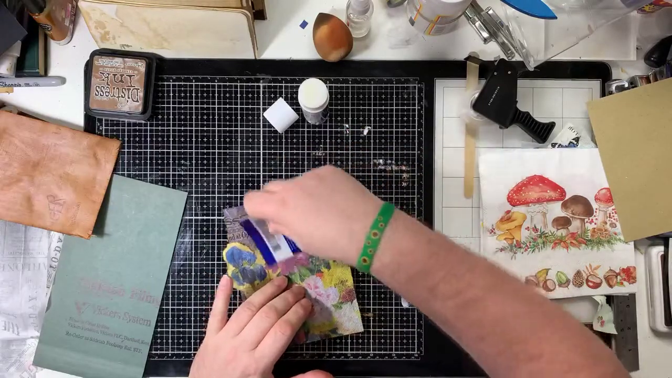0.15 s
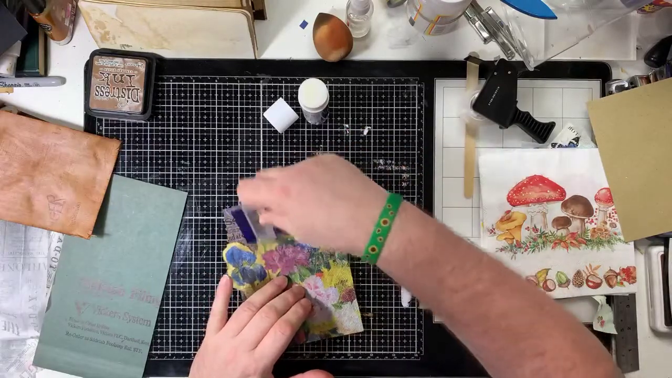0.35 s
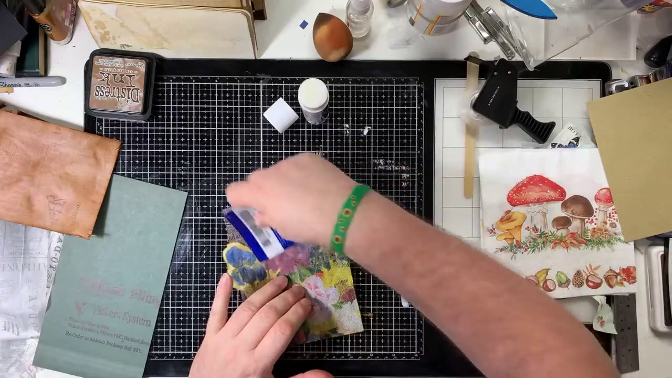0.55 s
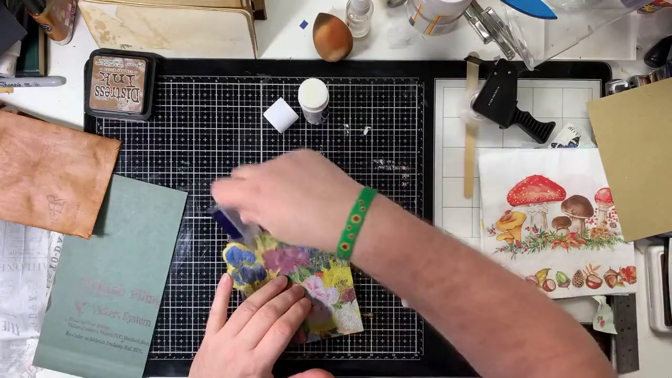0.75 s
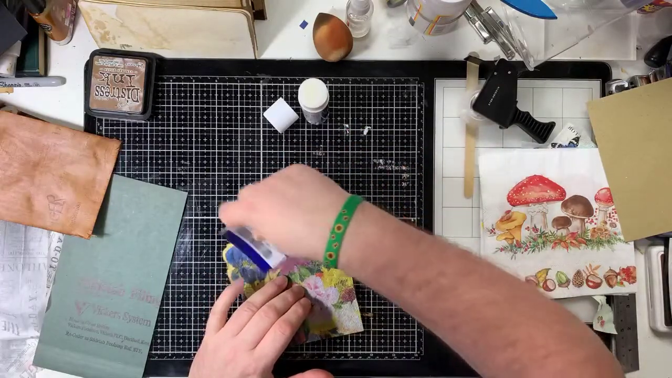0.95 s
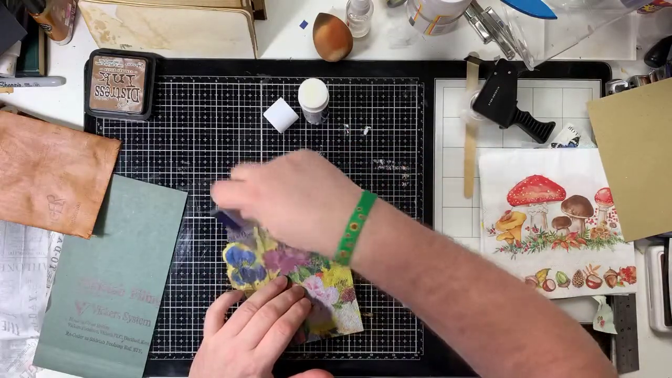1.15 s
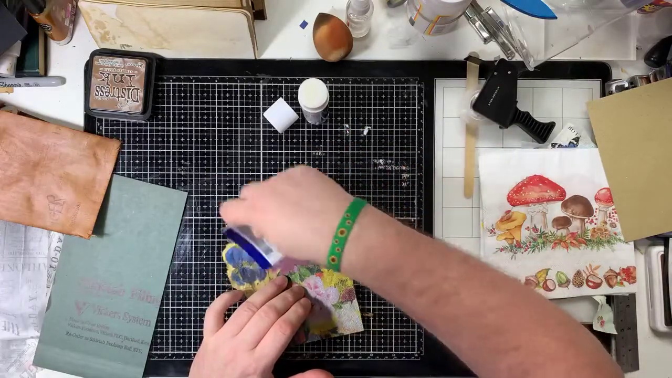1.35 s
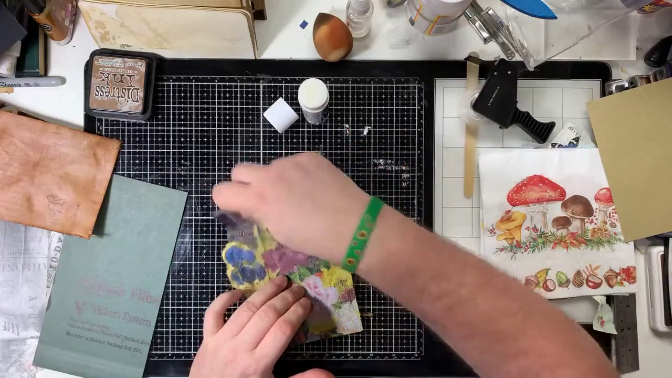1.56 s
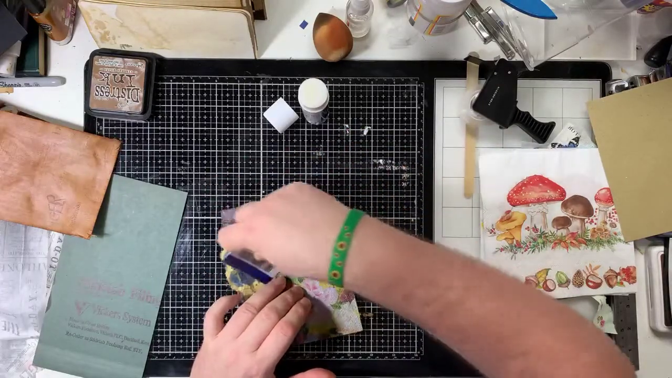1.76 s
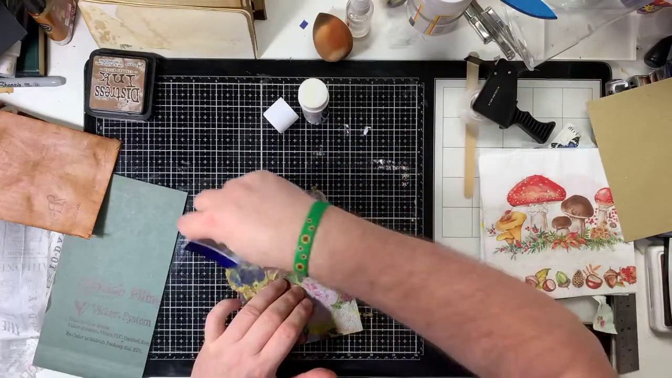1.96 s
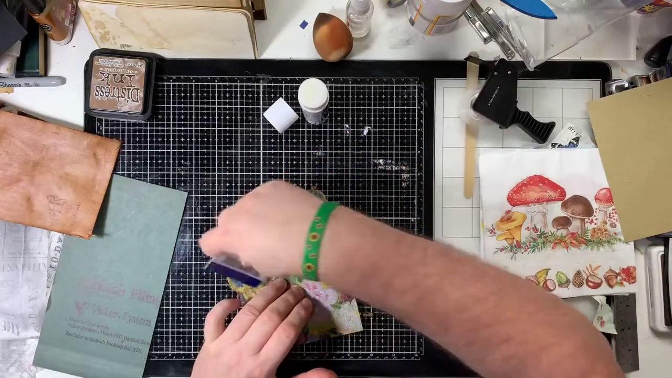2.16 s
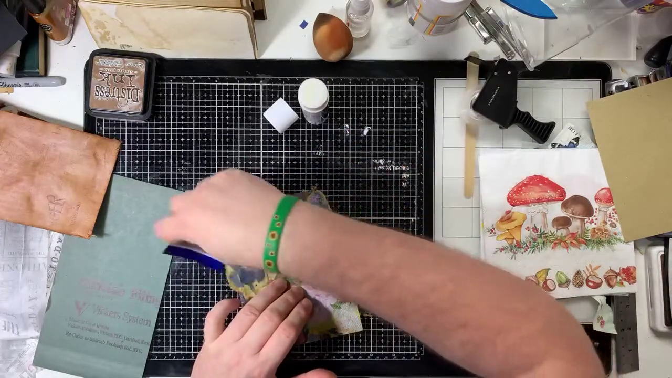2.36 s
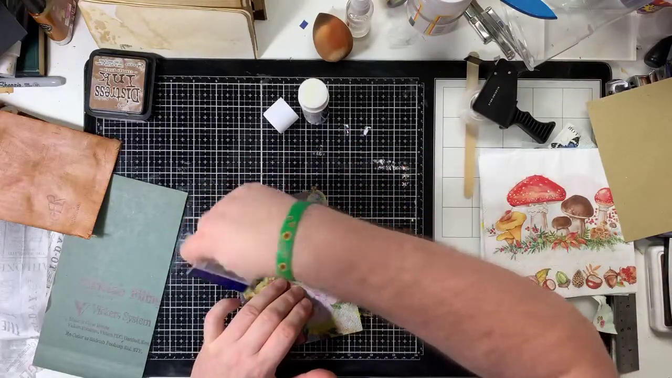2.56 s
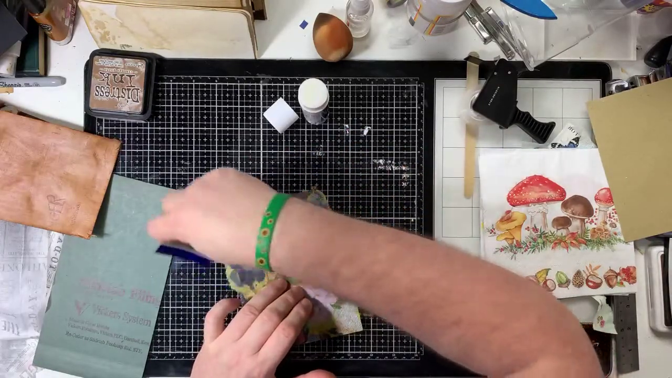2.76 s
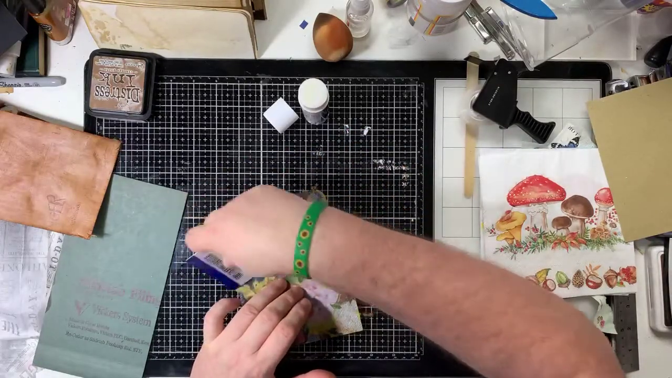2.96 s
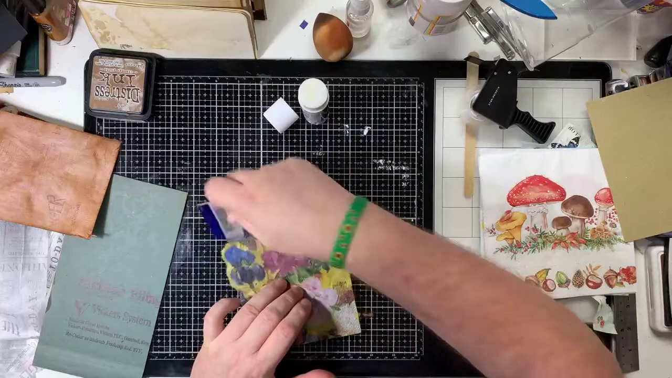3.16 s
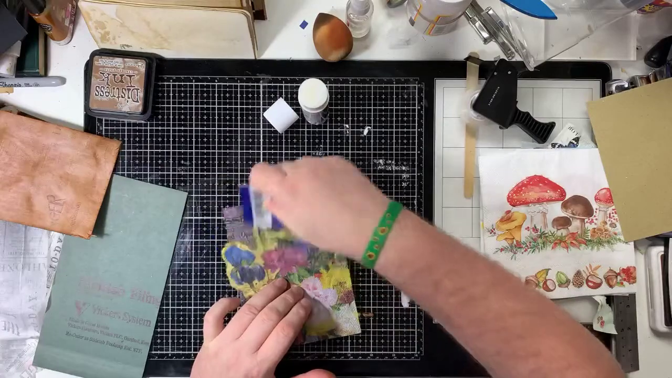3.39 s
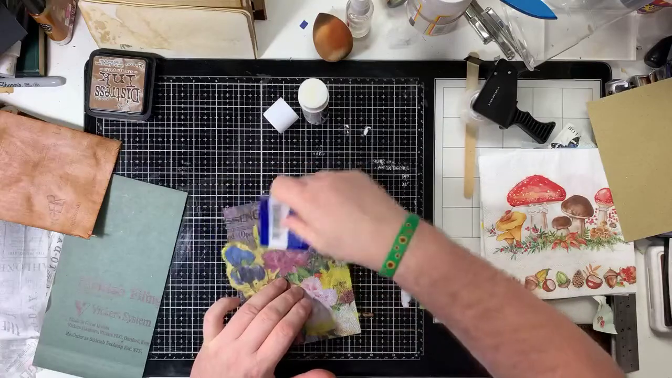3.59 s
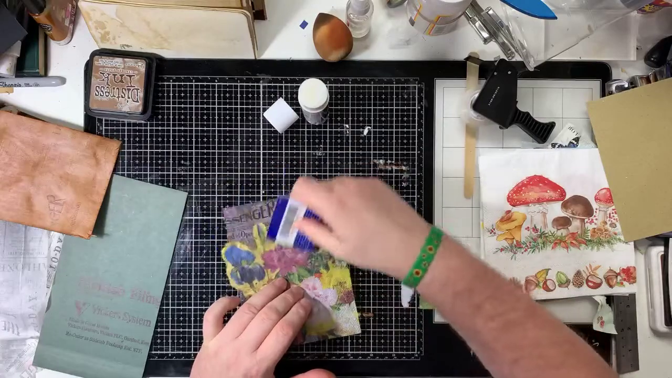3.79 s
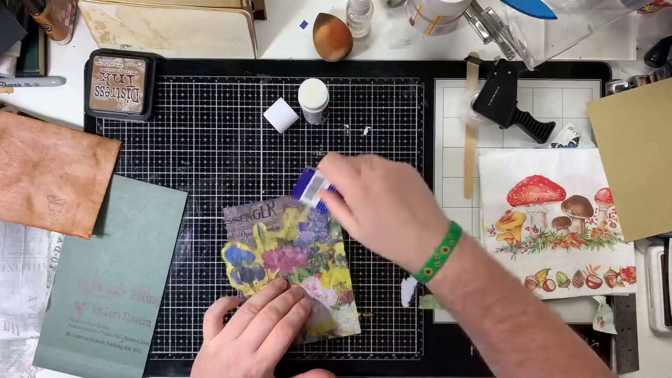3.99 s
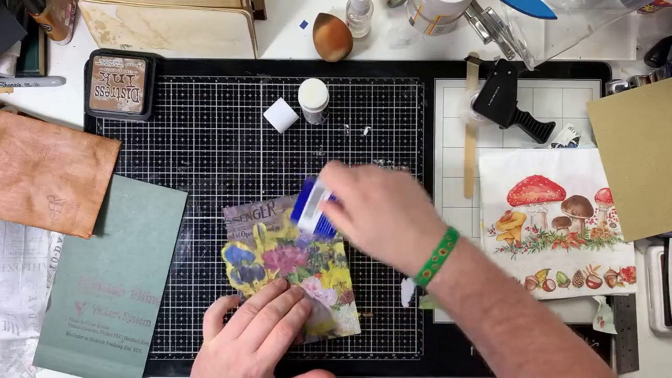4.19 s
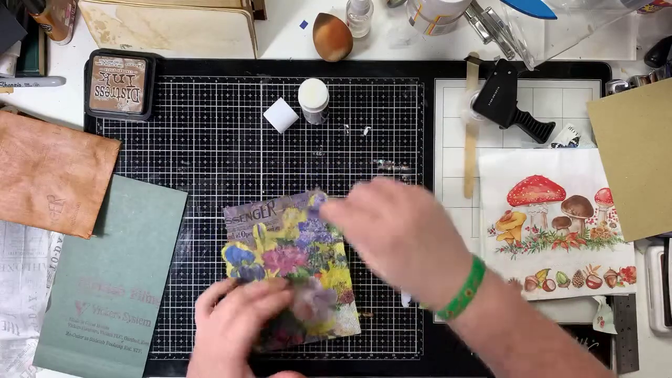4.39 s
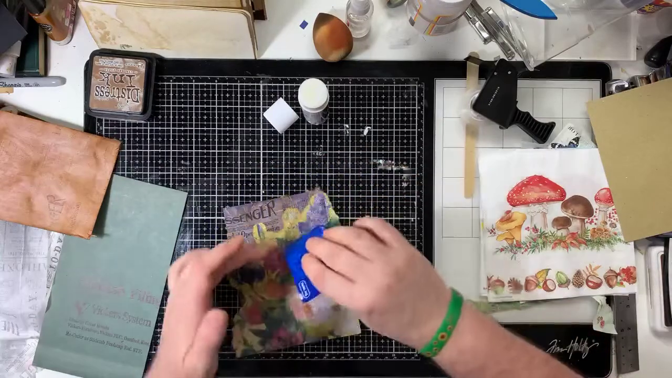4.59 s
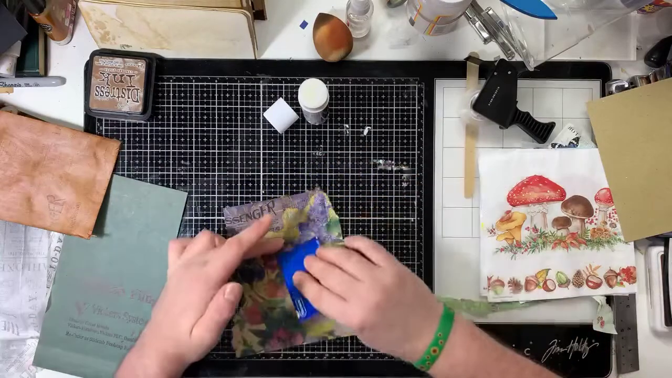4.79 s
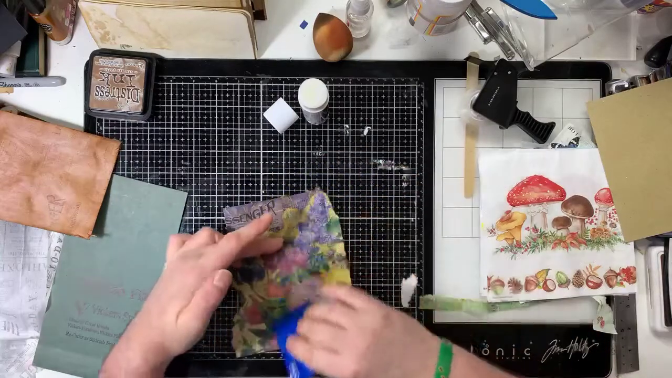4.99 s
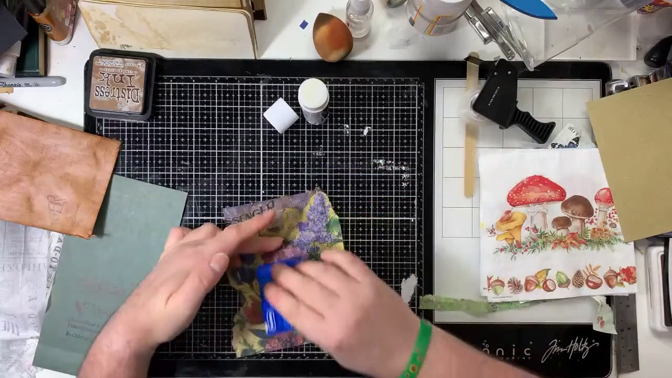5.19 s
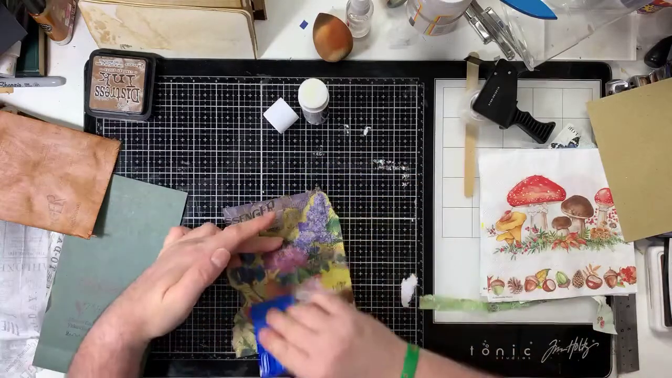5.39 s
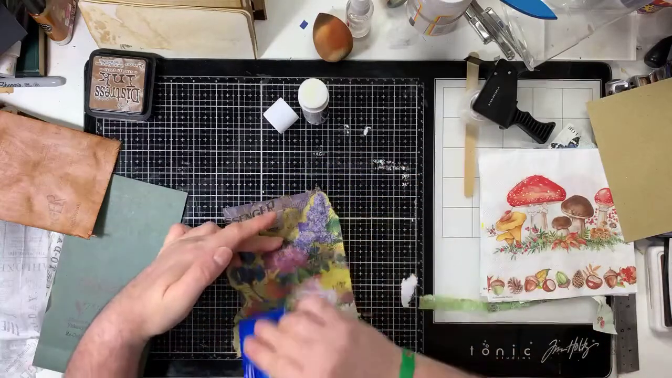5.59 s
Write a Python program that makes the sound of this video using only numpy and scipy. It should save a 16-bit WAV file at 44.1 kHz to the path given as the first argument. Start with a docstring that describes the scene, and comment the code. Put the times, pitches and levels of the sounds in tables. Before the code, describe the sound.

Close, dry scraping of a plastic spreader over paper, stroke after stroke, with light taps, crackly snags and low desk thuds.

```python
"""Plastic rubs over paper on a desk in a small room: tap, thump and scrape, stroke after stroke.
It is the edge of a glue spreader, close to a microphone. Noise made of tiny slips gives the scrape, rasp and fizz.
Short bursts of such noise give the taps and the crackles on ridges; fading low tones give the thumps.
The hand turns the blade three times, which changes its colour. Light brushing, a short room tail,
faint rumble and hiss lie behind."""
import sys
import numpy as np
from scipy import signal
from scipy.fft import rfft, irfft, next_fast_len
from scipy.io import wavfile
from scipy.ndimage import uniform_filter1d, map_coordinates

SR = 44100
rng = np.random.default_rng(int(sys.argv[2]) if len(sys.argv) > 2 else 0)


def generate_wav(signal):
    """Clip the signal to [-1, 1] and save it as 16-bit WAV at the path in sys.argv[1]."""
    frames = np.transpose(np.atleast_2d(signal))
    scaled = np.clip(frames, -1, 1) * 32767
    pcm = np.round(scaled).astype(np.int16)
    wavfile.write(sys.argv[1], SR, pcm)


N = 248724  # length in samples

# Levels in the tables are relative; the functions balance the layers against each other.
# The edge slides over the paper: start t/s, run-up/s, slide/s, level after the run-up/dB,
# level at the lift/dB, rasp offset/dB, fizz offset/dB
STROKES = [ (0.002, 0.068, 0.064, -37.5, -34, -13.5, -14), (0.35, 0.041, 0.16, -51.5, -33.5, -11, -13),
           (0.758, 0.083, 0.12, -46.5, -35.5, -10.5, -9.5), (1.189, 0.019, 0.15, -54, -31.5, -11, -12.5),
           (1.680, 0.065, 0.11, -49.5, -40, -9, -10.5), (2.075, 0.037, 0.14, -50.5, -39.5, -8, -10.5),
           (2.485, 0.058, 0.081, -51, -34.5, -9, -11.5), (2.852, 0.046, 0.068, -46.5, -33, -7, -11),
           (3.160, 0.071, 0.043, -33.5, -31, -17.5, -14.5), (3.431, 0.059, 0.055, -37, -34.5, -14, -13.5),
           (3.71, 0.043, 0.079, -40, -38.5, -11, -13.5), (3.998, 0.038, 0.076, -41, -34.5, -11.5, -15),
           (4.640, .172, .087, -40, -41, -13, -14.5), (5.128, .047, .205, -46.5, -47.5, -9, -14.5),
           (5.605, 0.033, .03, -44, -46, -8.5, -16)]
# The spreader lands and the hand's weight follows: t/s, knock level/dB, tick level/dB,
# thump level/dB, thump lag/s, thump pitch f/Hz
LANDINGS = [ (0.002, -55, -55, -54.5, 0.0035, 103), (0.34, -56, -53.5, -70.5, 0.009, 115),
            (0.747, -50.5, -44, -49, 0.014, 107), (1.179, -48.5, -40.5, -46, 0.0066, 120),
            (1.601, -49, -45.5, -49, .01, 107), (2.053, -45.5, -44, -46, 0.0057, 120),
            (2.457, -43.5, -41, -55.5, 0.018, 125), (2.831, -54, -51, -52.5, 0.012, 114),
            (3.132, -48.5, -40.5, -50, 0.011, 114), (3.418, -57.5, -33.5, -52.5, 0.015, 106),
            (3.694, -56.5, -40.5, -52.5, 0.0187, 107), (3.984, -62.5, -41.5, -50, .016, 92),
            (4.552, -75, -50.5, -59, 0.06, 99), (5.107, -66.5, -43, -49, 0.011, 106),
            (5.567, -52.5, -40.5, -44, 0.0097, 96)]
# Colour of a soft contact: f/Hz, level/dB
KNOCK = [(60, -33.5), (200, -16.5), (400, -4.5), (780, -0.5), (1800, -4.5), (2800, -12.5), (5000, -33)]
# Colour of the trembling desk top: f/Hz, level/dB
RUMBLE = [(25, -39.5), (45, -11), (72, -3), (110, 2.5), (145, -7.5), (210, -21), (500, -57.5)]


def rubbing():
    """The edge slips over fibres: pressure brings out a coarse rasp and the desk's rumble, speed a fine fizz."""
    # Scrape, rasp, fizz: level at first touch/dB, extra swell over the slide/dB, fall after the lift/(dB/s)
    friction = [(-62, -1, 515), (-68.5, 1, 516.5), (-79.5, -1.5, 391.5)]
    # Times when the hand turns the blade: t/s
    turns = [1.56, 3.08, 4.48]
    # Friction of plastic on paper in four directions: f/Hz, level/dB per Hz
    slanting = [(80, -32.5), (150, -21), (260, -23), (400, -17), (620, -16.5), (1050, -12), (1800, -11),
                (2400, -8.5), (3600, -7.5), (4500, -6), (5500, -1.5), (6300, -4.5), (8500, -8.5),
                (10200, -12.5), (12000, -20.5), (15500, -29.5)]
    sideways = [(80, -39.5), (150, -21.5), (260, -20.5), (400, -17), (620, -13), (1050, -10), (1800, -8.5),
                (2400, -6.5), (3600, -3.5), (4500, -1), (5500, 2.5), (6300, -2.5), (8500, -5.5),
                (10200, -12), (12000, -18.5), (15500, -30.5)]
    upwards = [(80, -41.5), (170, -26), (300, -16.5), (500, -16), (700, -23), (1000, -12.5), (1200, -14.5),
               (1900, -13.5), (2700, -8.5), (4800, -6.5), (5800, 0.5), (6500, -5), (8200, -6.5),
               (10200, -15.5), (12000, -22), (15500, -28.5)]
    downwards = [(80, -52.5), (250, -19.5), (360, -15.5), (700, -16), (1100, -7), (1550, -9.5),
                 (2100, -11.5), (3000, -6), (4500, -6), (5800, 1.5), (6500, -4.5), (8000, -5.5),
                 (10000, -13.5), (13800, -21), (15500, -33.5)]

    rasp_db, fizz_db = np.transpose(STROKES)[-2:]
    offsets = (np.zeros(len(STROKES)), rasp_db, fizz_db)
    scrape, rasp, fizz = [contact(*part, offset) for part, offset in zip(friction, offsets)]
    direction = np.searchsorted(turns, np.arange(N) / SR)

    def blade(force):
        """The force in the colour of the current direction, split into middle, low and high."""
        colours = [ring(force, way) for way in (slanting, sideways, upwards, downwards)]
        return split(np.choose(direction, colours))

    tooth = amp(0.34 * wobble(70) + 0.4 * wobble(300))  # the paper's uneven surface
    fine_slips = slips(rate=7000, spread_db=-0.5, smooth=1.0)
    middle, _, high = blade(roam(tooth * fine_slips, depth_db=2.5))
    coarse_slips = slips(rate=1500, spread_db=1.0, smooth=0.39)
    low = blade(roam(tooth * coarse_slips, depth_db=4.0))[1]
    pressed = amp(0.36) * low + amp(-19) * rumbling()
    return amp(-1.23) * scrape * middle + amp(-2.1) * fizz * high + rasp * pressed


def contact(touch_db, swell_db, fall_db_per_s, offsets_db):
    """Gain of one part of the friction: a stroke runs up, changes as the hand leans in, and dies at the lift."""
    settle_s = 0.013  # the edge settles on the paper just before the run-up
    t, gain = np.arange(N) / SR, np.zeros(N)
    for (start, run_up, slide, early_db, late_db, _, _), offset_db in zip(STROKES, offsets_db):
        lift = start + run_up + slide
        early = early_db + offset_db - swell_db / 2
        late = late_db + offset_db + swell_db / 2
        level_db = np.interp(t, [start, start + run_up, lift], [touch_db, early, late])
        settle = np.clip(1 + (t - start) / settle_s, 0, 1)
        gain += settle * amp(level_db - fall_db_per_s * np.clip(t - lift, 0, 1))
    return gain


def landings():
    """The blade slaps down: hard ticks and a duller knock; both rise faster when the tick is the stronger."""
    # Colour of a hard contact: f/Hz, level/dB
    tick_colour = [(800, -22.5), (2500, -6.5), (4000, 4.5), (5700, 9.5), (8000, -1), (10500, -13.5),
                   (15000, -43.5)]
    s, knock_db, tick_db = np.transpose(LANDINGS)[:3]
    softness = amp(0.14 * (knock_db - tick_db))  # stretches the rise times (s) below

    tick = bursts(s, tick_db, softness * 0.0023, hold=0.017, t60=0.068)
    tick = tick * slips(rate=2300, spread_db=3.5, smooth=0.28)

    knock = bursts(s, knock_db, softness * 0.0052, hold=0.007, t60=0.14)
    knock = knock * roam(slips(rate=1300, spread_db=7.5, smooth=0.16), depth_db=3.5)
    return amp(-10) * ring(tick, tick_colour) + amp(-3) * ring(knock, KNOCK)


def desk(rise=0.011, shudder_db=-11):
    """The hand's weight bends the desk top for a few swings; a low irregular shudder follows."""
    t, push = np.arange(SR // 8) / SR, np.zeros(N + SR)
    swell = (t / rise * np.exp(1 - t / rise)) ** 4  # strongest after rise seconds
    s, _, _, thump_db, lag, pitch_hz = np.transpose(LANDINGS)
    for at, db, hz in zip(s + lag, thump_db, pitch_hz):
        swings = amp(db) * swell * np.sin(2 * np.pi * hz * t)
        push[max(round(at * SR), 0):][:len(t)] += swings
    shudder = bursts(s + lag, thump_db + shudder_db, attack=0.028, hold=0.04, t60=0.16)
    return push[:N] + rumbling() * shudder


def catches():
    """At a ridge the edge sticks and lets go in a dense run of sharp snaps."""
    # The edge catches on a ridge: t/s, crackle level/dB, knock level/dB
    ridges = [(0.538, -33, -47), (0.937, -34, -39.5), (0.959, -39, -49.5), (1.345, -27, -49),
              (1.355, -36, -49.5), (1.844, -40, -49), (2.24, -40, -44), (2.601, -48, -45),
              (2.944, -34.5, -46.5), (2.961, -32.5, -51.5), (3.245, -35, -64.5), (4.105, -39.5, -52.5),
              (5.347, -47.5, -53)]
    # Colour of snagged fibres: f/Hz, level/dB
    crackle_colour = [(1000, -33), (2800, -23.5), (4200, -16.5), (5500, 3.5), (7600, 0), (10000, -6.5),
                      (11500, -15.5), (15000, -20.5)]
    attack_s, hold_s = 0.00079, 0.01
    s, crackle_db, knock_db = np.transpose(ridges)
    snaps = roam(slips(rate=3500, spread_db=0.5, smooth=0.65), depth_db=5.5)
    crackle = snaps * bursts(s, crackle_db, attack_s, hold_s, t60=0.092)
    knock = snaps * bursts(s, knock_db, attack_s, hold_s, t60=0.076)
    return ring(crackle, crackle_colour) + ring(knock, KNOCK)


def brushing():
    """With almost no weight on it, the paper gives only a thin, hollow hiss that slowly sags."""
    # The paper is brushed lightly: t/s, length/s, level/dB
    brushes = [(1.416, .275, -56), (1.94, 0.054, -72.5), (3.893, 0.094, -71), (4.165, 0.021, -54.5),
               (4.203, 0.175, -64), (4.38, .009, -67), (4.586, 0.095, -57), (4.989, 0.064, -73.5)]
    # Colour of a light contact: f/Hz, level/dB per Hz
    hiss_colour = [(100, -20), (200, -12), (380, -3), (700, -9.5), (1100, -14.5), (1700, -12), (2400, -18),
                   (3500, -15), (5500, -6.5), (8000, -9), (11000, -9), (15000, -24.5)]
    sag_db_per_s, fade_s = 17, 0.0056
    t, gain = np.arange(N) / SR, np.zeros(N)
    for s, length, db in brushes:
        inside = np.clip(t - s, 0, length)
        outside = t - s - inside  # time before the start or after the end
        gain += amp(db - sag_db_per_s * inside) * np.exp(-(outside / fade_s) ** 2)
    middle, low, high = split(ring(roam(rng.standard_normal(N), depth_db=3.5), hiss_colour))
    return amp(-3.5) * gain * (middle + amp(-11) * low + amp(-15.5) * high)


def room(x):
    """A small room's short tail of fading noise; each frequency dies at its own speed."""
    # Time to fall by 60 dB: f/Hz, t60/s
    decay = [(100, 0.39), (1000, 0.12), (3000, 0.13), (6000, 0.18), (10000, 0.17), (15000, 0.18)]
    hz, t, z = signal.stft(rng.standard_normal(SR // 2), SR, nperseg=256)
    fading = z * amp(-60 * t / along(decay, hz)[:, None])
    tail = signal.istft(fading, SR, nperseg=256)[1]
    delayed = np.pad(x, (round(0.004 * SR), 0))
    return signal.fftconvolve(delayed, tail / np.linalg.norm(tail))[:N]


def floor():
    """Faint room rumble and microphone hiss, made of steady coloured noise."""
    # Colour of the background: f/Hz, level/dB per Hz
    background = [(18, -26.5), (30, -17.5), (60, -8), (110, 0.5), (180, -9), (270, -5), (420, -10),
                  (650, -10), (1000, -13.5), (1600, -19), (3000, -22), (9000, -22), (14000, -30),
                  (15500, -46.5)]
    return amp(-76.5) * unit(filtered(rng.standard_normal(N), lambda hz: amp(along(background, hz))))


def rumbling():
    """Low noise in the colour of the trembling desk top; rms 1."""
    return unit(filtered(rng.standard_normal(N), lambda hz: amp(along(RUMBLE, hz))))


def slips(rate, spread_db, smooth):
    """Tiny slips of uneven size at random moments, rate a second, on some smooth sliding noise; rms 1."""
    happens = rng.random(N) < rate / SR
    size = amp(spread_db * np.clip(rng.standard_normal(N), -2, 2))
    grains = happens * rng.choice([-1, 1], N) * size
    return unit(unit(grains) + smooth * rng.standard_normal(N))


def bursts(times, levels_db, attack, hold, t60):
    """An envelope that rises, holds and dies away at each time (all times in s)."""
    t, out = np.arange(SR // 3) / SR, np.zeros(N + SR)
    fall = amp(-60 * np.maximum(t - hold, 0) / t60)
    for s, db, rise in np.broadcast(times, levels_db, attack):
        shape = fall * (1 - np.exp(-t / max(rise, 1e-4)))
        out[max(round(s * SR), 0):][:len(t)] += amp(db) * shape
    return out[:N]


def ring(x, spectrum):
    """A contact force, coloured by its spectrum and the body's resonances; white noise keeps its power."""
    # Resonances and hollows of blade and desk top: f/Hz, width/Hz, lift/dB
    body = [(626, 55, 2.5), (795, 24, 7), (997, 17, 4.5), (1130, 87, -3), (1306, 43, 6), (1617, 34, 6),
            (1750, 69, -3), (2995, 170, 4.5), (3236, 150, -2.5), (3950, 70, 3.5), (5050, 200, 2),
            (5640, 110, 5.5), (6700, 280, -2), (7810, 400, 1.5)]

    def gain(hz):
        """Size of the filter at each frequency."""
        lift = sum(db / (1 + (2 * (hz - centre) / width) ** 2) for centre, width, db in body)
        return unit(amp(along(spectrum, hz) + lift))

    return filtered(x, gain)


def roam(x, depth_db):
    """As the contact travels over the sheet, narrow resonances come and go; rms 1."""
    z = signal.stft(x, nperseg=1024)[2]
    field = uniform_filter1d(rng.standard_normal(z.shape), size=3, axis=0)  # smooth over frequency
    field = uniform_filter1d(field, size=6, axis=1)  # smooth over time
    return unit(signal.istft(z * amp(depth_db * unit(field)), nperseg=1024)[1][:N])


def split(x):
    """Three softly overlapping bands of x, each of rms 1: middle, low, high."""
    m = next_fast_len(N + SR // 8)
    hz = np.fft.rfftfreq(m, 1 / SR)
    low = 1 / (1 + (hz / 2700) ** 5)
    high = 1 - 1 / (1 + (hz / 9300) ** 12)
    shares = (1 - low - high, low, high)
    return np.array([unit(irfft(rfft(x, m) * share, m)[:N]) for share in shares])


def wobble(rate):
    """A smooth random curve, rate knots a second."""
    knots = rng.standard_normal(int(N * rate / SR) + 4)
    return map_coordinates(knots, [np.arange(N) * rate / SR])


def filtered(x, gain):
    """x through the causal filter whose size is gain(Hz)."""
    m = 2 * next_fast_len(N // 2 + SR // 8)
    size = np.maximum(gain(np.fft.rfftfreq(m, 1 / SR)), 1e-6)
    # folding the cepstrum forward makes the filter respond as early as it can
    cepstrum = irfft(np.log(size), m)
    cepstrum[1:m // 2] *= 2
    cepstrum[m // 2 + 1:] = 0
    return irfft(rfft(x, m) * np.exp(rfft(cepstrum)), m)[:N]


def band(x, lo_hz, hi_hz):
    """The part of x between two frequencies."""
    m = next_fast_len(N + SR // 8)
    hz = np.fft.rfftfreq(m, 1 / SR)
    return irfft(rfft(x, m) * ((hz >= lo_hz) & (hz < hi_hz)), m)[:N]


def along(points, hz):
    """Read a curve of (Hz, value) points at hz, with straight lines on a log frequency axis."""
    f, v = np.transpose(points)
    return np.interp(np.log(hz + 1), np.log(f + 1), v)


def amp(db):
    """Decibels as a plain factor."""
    return 10 ** (np.asarray(db) / 20)


def unit(x):
    """x scaled to rms 1."""
    return x / np.sqrt(np.mean(x ** 2) + 1e-20)


def scene():
    """The contact sounds and their room tail, with the desk and the background added."""
    near = rubbing() + landings() + catches() + brushing()
    return (near + amp(-10) * room(near) + desk() + floor())[None]


def record(dry):
    """The recorder keeps nothing above its band limit."""
    return band(dry[0], 0, 15780)[None]


dry = scene()
out = record(dry)
generate_wav(out)
```